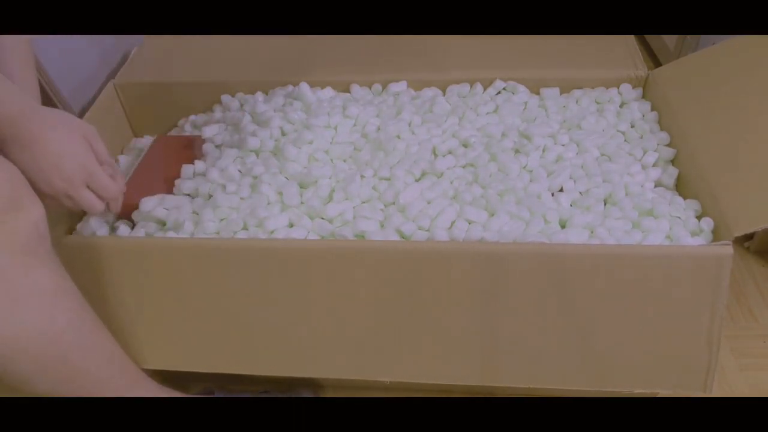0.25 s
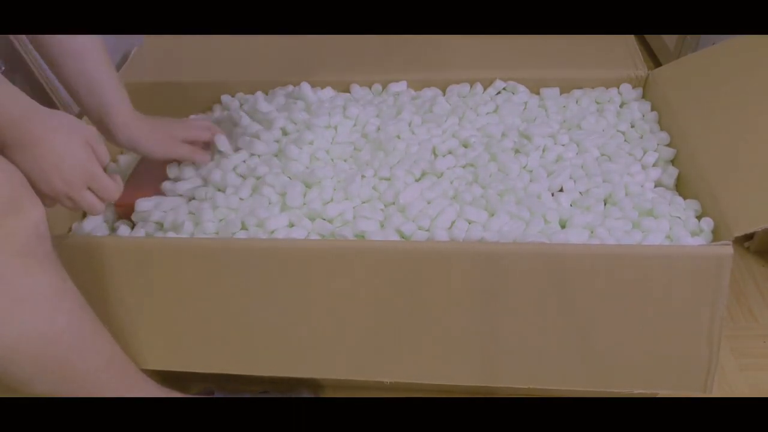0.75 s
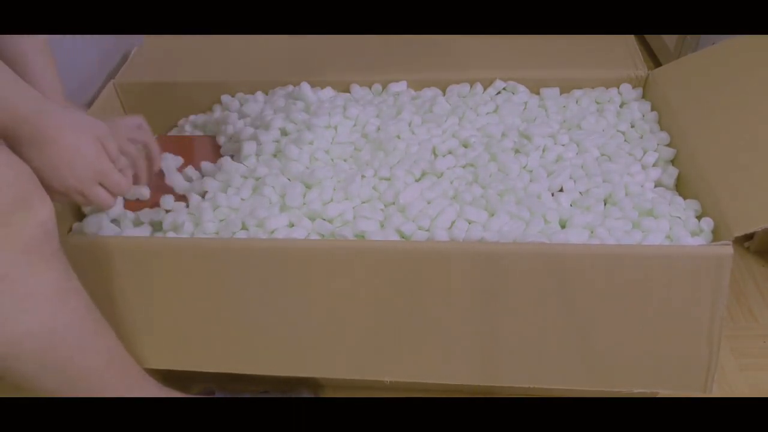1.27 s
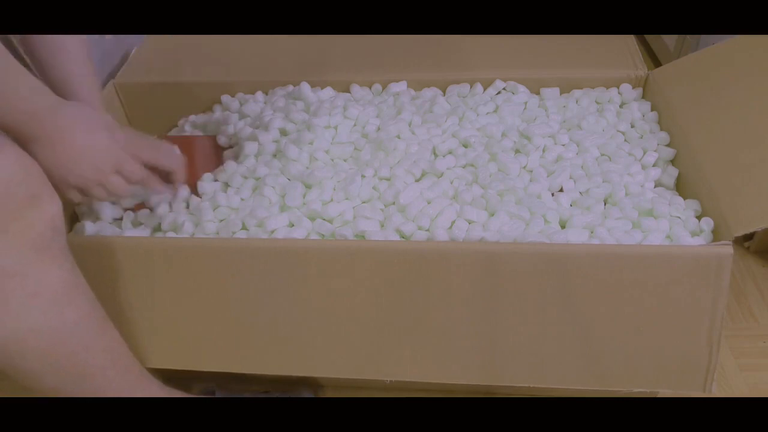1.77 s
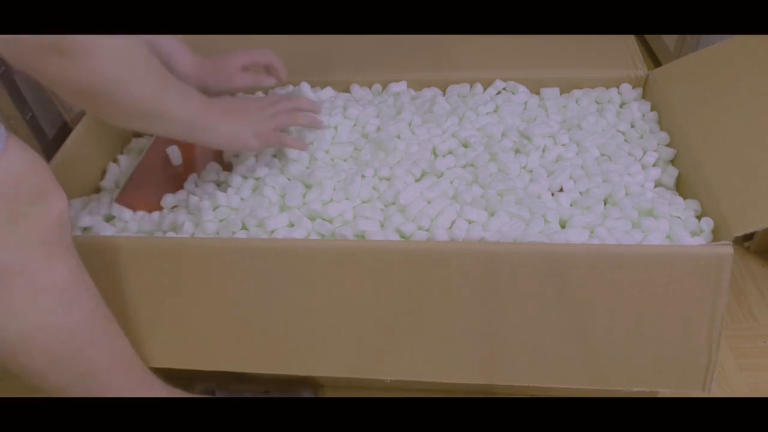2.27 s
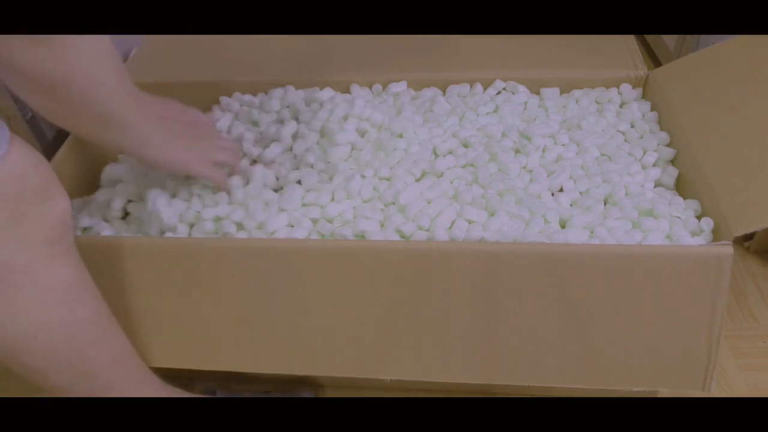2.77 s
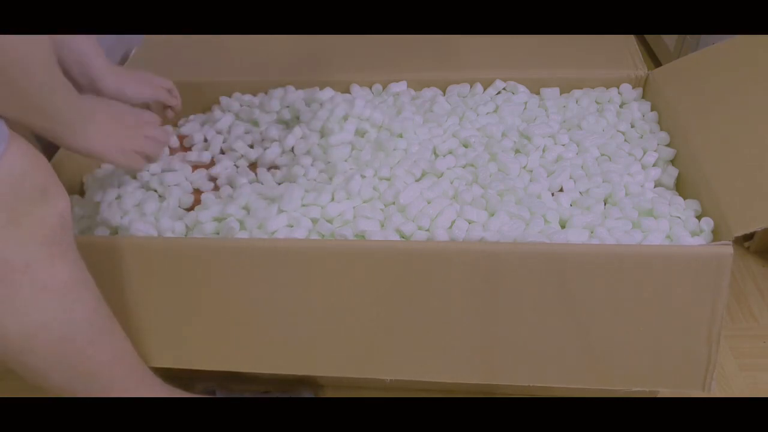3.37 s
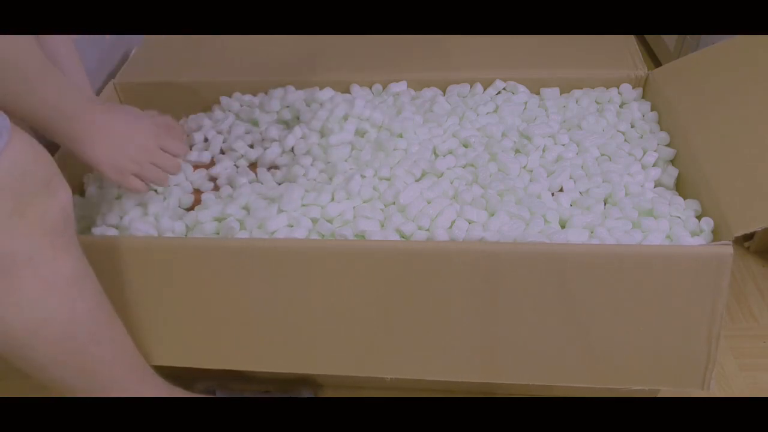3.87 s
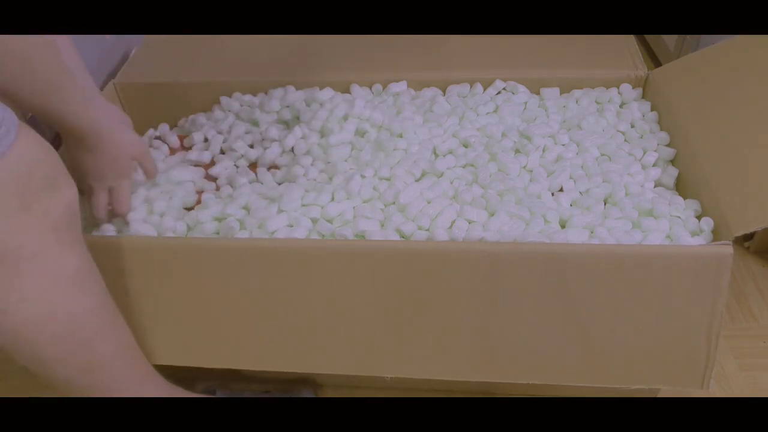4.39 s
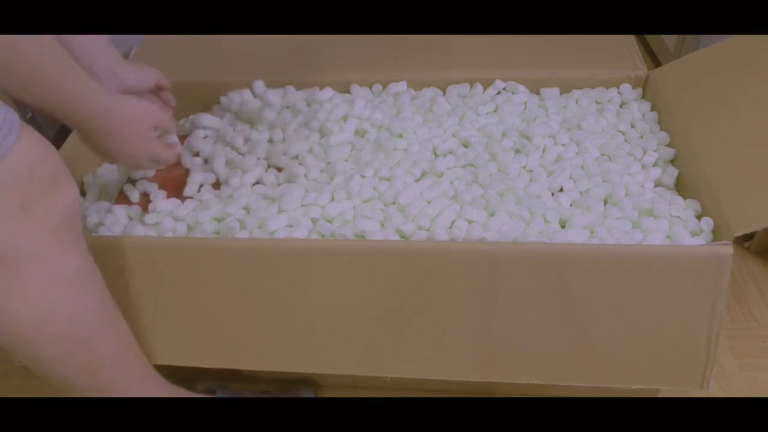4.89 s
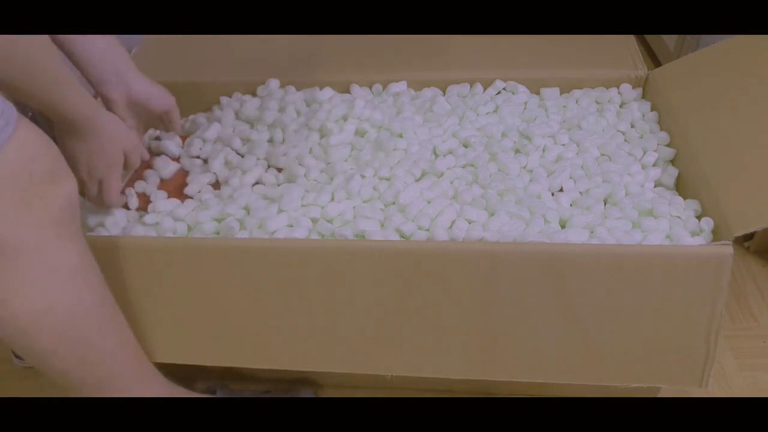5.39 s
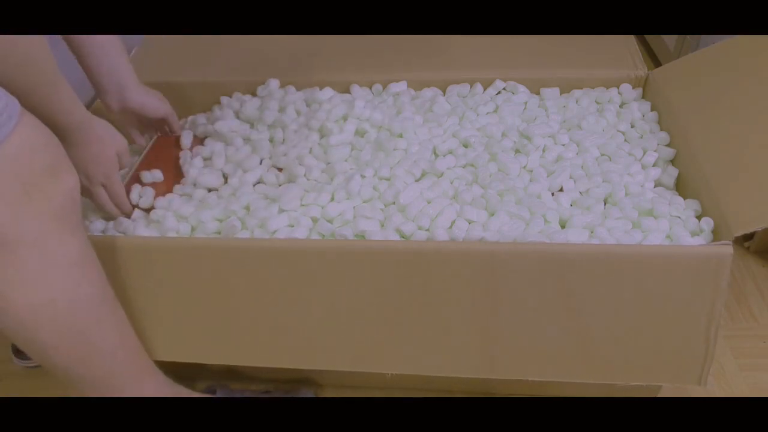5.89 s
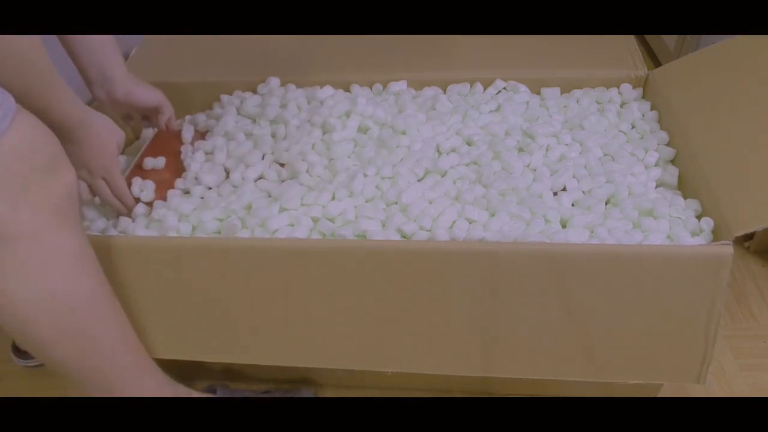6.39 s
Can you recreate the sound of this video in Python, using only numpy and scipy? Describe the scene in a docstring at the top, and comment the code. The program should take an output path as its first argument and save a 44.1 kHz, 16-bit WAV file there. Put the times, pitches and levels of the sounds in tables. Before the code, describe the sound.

Hands dig through foam packing peanuts in a big cardboard box. The chips crunch and rustle in uneven strokes, with sharp little snaps and one brief high squeal early on, ticking as they settle between pushes. The box walls rumble softly. Near the end, hands knock on the cardboard and a buried parcel scrapes along it. The small room has a faint hum, and the box sits slightly left in stereo.

```python
"""Foam packing peanuts crunch as hands dig through a big cardboard box, in a small room.
The chips stick and slip, tumble with each stroke and settle after it, snap free and briefly squeal.
The box walls rumble under the pushes; at the end a buried parcel is dragged along the cardboard.
Heard on a spaced pair of microphones, the box a little to the left, over room air and a faint hum."""
import sys
import numpy as np
from scipy import signal
from scipy.fft import rfft, irfft
from scipy.io import wavfile
from scipy.ndimage import uniform_filter1d

SR = 44100
rng = np.random.default_rng(int(sys.argv[2]) if len(sys.argv) > 2 else 0)


def log_audio(samples):
    """Write samples as a 16-bit WAV file to the path given in sys.argv[1]."""
    # one column per channel
    frames = np.atleast_2d(samples).T
    # limit to full scale, then quantise
    limited = np.clip(frames, -1, 1)
    pcm = np.round(limited * 32767).astype(np.int16)
    wavfile.write(sys.argv[1], SR, pcm)


N = 292824
TIME = np.arange(N) / SR
ROOM_T60_S, BOX_T60_S, ROOM_TAIL_DB = 0.33, 0.05, -8.5
MIC_SPACING_M, RIGHT_MIC_LAG_S = 0.11, .00017
# the heap rests SETTLED_S after a stroke; a stroke of FULL_STROKE_S or more unsettles it fully
SETTLED_S, FULL_STROKE_S = 0.73, 0.05
DRAG_START_S, DRAG_RISE_S = 6.10, 0.18

# the hum in the room wavers and fades: (t/s, f/Hz, level/dB)
HUM_CURVE = [(0, 190.8, -82), (.9, 193.3, -68.5), (1.15, 195, -94), (2.3, 194.2, -78.5), (3.25, 185, -90),
             (3.8, 190.2, -83.5), (4.4, 189, -101)]
# spectra of room air, box walls, parcel scrape, hollow box and foam chips: (f/Hz, relative level/dB)
AIR_SPECTRUM = [(20, 1), (55, 3), (100, -21.5), (300, -0.5), (1000, -16.5), (2000, -41), (5000, -1.5),
                (9000, -13.5), (16000, -38.5)]
WALL_SPECTRUM = [(20, -45.5), (40, -14), (58, 1.5), (85, 2.5), (125, -7), (200, -17), (500, -45)]
SCRAPE_SPECTRUM = [(150, -3), (400, -5), (1200, -9.5), (2200, 1.5), (3100, 2.5), (4200, -3.5),
                   (7000, -14.5), (14000, -20)]
HOLLOW_SPECTRUM = [(70, -48.5), (140, -5.5), (240, 0.5), (420, -4), (700, -2), (1200, -2), (1600, -2),
                   (2200, -8), (3200, -11), (6000, -47), (12000, -38)]
FOAM_SPECTRUM = [(500, -29), (1800, -8.5), (2400, -2), (2900, -2), (3800, -2), (5000, -3), (6700, -4),
                 (7700, -10), (10000, -7), (14000, -9), (16000, -14)]
# cardboard panel resonances: (f/Hz, width/Hz, gain/dB)
PANEL_MODES = [(320, 25, -12.5), (413, 43, 3), (572, 79, -3), (870, 35, 1.5), (1030, 70, -5.5)]
# fingers and wrists knock on cardboard: (t/s, relative peak/dB, ring f/Hz)
HAND_KNOCKS = [(.08, -51, 112), (.492, -69, 990), (1.031, -51, 880), (1.124, -45, 900), (5.875, -37, 440),
               (5.986, -29.5, 1470)]
# a fingertip rubs on the parcel: (t/s, length/s, f/Hz, relative level/dB)
FINGER_RUBS = [(3.961, .024, 744, -57), (3.997, 0.017, 768, -68.5)]
# harmonics of that rub, from the fundamental up: (relative level/dB)
RUB_HARMONICS = [0, -4, -4]
# foam squeals on foam: (t/s, length/s, f/Hz, relative level/dB, octave overtone/dB)
FOAM_SQUEALS = [(1.589, .014, 6830, -40.5, -0.5), (1.601, 0.011, 6810, -23.5, -14),
                (1.606, .006, 7960, -36, -22), (1.615, 0.015, 6766, -29, -5), (1.63, 0.018, 7060, -23, -20),
                (1.637, 0.0098, 8200, -33, -21), (1.657, 0.016, 7120, -32, -6)]
# a chip slips free: (t/s, relative peak/dB, ring f/Hz)
CHIP_SNAPS = [(0.4958, -51.5, 6340), (0.9217, -15.5, 3730), (1.0128, -25.5, 5860), (1.545, -38, 4930),
              (1.9545, -43.5, 4380), (2.16, -46, 4670), (2.592, -21, 6160), (2.9435, -24.5, 5000),
              (3.3623, -46.5, 4070), (3.5706, -36, 5510), (4.265, -37, 5400), (4.2857, -33, 3860),
              (4.342, -31, 4770), (4.4188, -28.5, 3360), (5.0826, -34, 8200), (5.343, -35, 5200),
              (5.4355, -28.5, 4540), (5.4863, -23.5, 4300), (5.7313, -32, 4540), (5.9244, -28.5, 5460),
              (5.9399, -26.5, 5500), (6.0592, -27.5, 4500), (6.1436, -26, 3900), (6.1688, -26, 3840)]
# a hand pushes into the heap, levels relative: (t/s, rise/s, length/s, chips/dB, bumps/dB, walls/dB)
HAND_STROKES = [(-.02, 0.016, 0.14, -67.5, -66, -62.5), (.575, 0.041, .078, -46, -65, -80),
                (0.611, 0.091, 0.12, -42, -50.5, -79), (0.731, 0.018, 0.099, -51, -65, -72),
                (0.862, 0.063, .09, -42, -50.5, -71), (0.968, 0.037, 0.12, -47, -56.5, -77),
                (1.178, 0.03, 0.15, -74, -65, -87), (1.514, 0.036, 0.11, -47, -56.5, -66),
                (1.623, .036, 0.076, -49, -58.5, -57.5), (1.753, .035, .044, -50, -54, -81),
                (1.877, 0.021, 0.13, -64.5, -67, -86), (2.148, .013, 0.028, -72, -93, -90),
                (2.366, .052, .34, -37.5, -45, -60.5), (2.743, 0.069, 0.21, -43, -50.5, -63.5),
                (3.04, 0.025, 0.086, -66.5, -66.5, -77), (3.549, 0.039, 0.038, -55.5, -70, -81),
                (3.657, .038, 0.045, -61, -73, -82), (3.847, 0.018, 0.11, -63.5, -75.5, -82),
                (3.937, .027, 0.042, -56, -74.5, -82), (4.07, .05, 0.068, -71, -81, -86),
                (4.27, 0.049, 0.089, -43.5, -50.5, -62.5), (4.407, 0.011, 0.022, -42, -47.5, -55),
                (4.477, 0.022, 0.1, -48.5, -62, -78), (4.582, 0.08, 0.084, -41.5, -49, -82),
                (4.764, 0.017, 0.18, -61, -64.5, -76), (5.052, 0.04, 0.071, -58.5, -67.5, -59),
                (5.103, 0.024, 0.033, -54, -48, -67), (5.246, 0.0092, 0.011, -58, -71, -80),
                (5.385, 0.086, 0.16, -42.5, -49.5, -59), (5.584, 0.022, 0.083, -52, -61, -70),
                (5.727, 0.0068, 0.014, -46.5, -55, -62), (5.81, 0.051, 0.071, -42, -47, -50),
                (5.929, 0.077, 0.13, -47, -49, -53.5), (6.082, 0.048, 0.078, -49.5, -53, -70)]
CHIPS_COLUMN, BUMPS_COLUMN, WALLS_COLUMN = 3, 4, 5
# top treble of the crunch: (t/s, gain/dB)
CRUNCH_TREBLE = [(.65, -4.5), (1.07, -0.5), (1.25, -8.5), (1.58, 0), (2.4, -2), (3.1, -4), (3.6, -3),
                 (4.75, -4), (5.15, 1), (5.75, -4), (6.15, -1.5)]


def from_db(db):
    """Decibels to gain."""
    return 10 ** (np.asarray(db) / 20)


def rms_one(x):
    """Scale to an rms of one."""
    return x / np.sqrt(np.mean(x ** 2) + 1e-20)


def in_time(rows):
    """The columns of a curve at every sample."""
    times, *columns = np.transpose(rows)
    return [np.interp(TIME, times, column) for column in columns]


def drift(per_s):
    """A random wander with an rms of one."""
    knots = rng.standard_normal(8192)
    return rms_one(np.interp(TIME * per_s, np.arange(len(knots)), knots))


def colour(x, spectrum, size=16384):
    """Causal (minimum-phase) filter that follows a spectrum."""
    hz, db = np.transpose(spectrum)
    bin_hz = np.arange(size // 2 + 1) * SR / size
    gain = from_db(np.interp(np.log(bin_hz + 1), np.log(hz), db))
    cepstrum = irfft(np.log(gain))
    cepstrum[1:size // 2] *= 2
    cepstrum[size // 2 + 1:] = 0
    response = irfft(np.exp(rfft(cepstrum)))
    return np.apply_along_axis(signal.oaconvolve, -1, x, response)[..., :N]


def brighten(x, above_hz, db):
    """Raise or lower everything above a frequency."""
    low = signal.sosfiltfilt(signal.butter(3, above_hz, fs=SR, output="sos"), x)
    return low + from_db(db) * (x - low)


def resonate(x, hz, width_hz):
    """One resonance with a gain of one at its peak."""
    radius = np.exp(-np.pi * width_hz / SR)
    feedback = [1, -2 * radius * np.cos(2 * np.pi * hz / SR), radius ** 2]
    return signal.lfilter(np.array([1, 0, -1]) * (1 - radius ** 2) / 2, feedback, x + 1e-18)


def slips(per_s, spread_db):
    """Random tiny clicks of uneven size; their mean power does not depend on their rate."""
    chance = np.clip(per_s / SR, 1e-4, 1) * np.ones(N)
    at = np.flatnonzero(rng.random(N) < chance)
    clicks = np.zeros(N)
    sizes = from_db(spread_db * np.minimum(rng.exponential(1, N)[at], 4))
    clicks[at] = sizes * np.sign(rng.random(N)[at] - .5) / np.sqrt(chance[at])
    return rms_one(clicks)


def bursts(rows, t60_s, width_share, crack_db, gain_db):
    """Each contact lets go in a dying run of slips that rings the piece it happens on."""
    out, age = np.zeros(N + SR), TIME[:SR // 4]
    for start_s, peak_db, hz in rows:
        run = rng.standard_normal(len(age)) * from_db(-60 * age / t60_s)
        burst = rms_one(resonate(run, hz, hz * width_share)) + from_db(crack_db) * rms_one(run)
        at = int(start_s * SR)
        out[at:at + len(age)] += from_db(peak_db + gain_db) * burst / np.abs(burst).max()
    return out[:N]


def squeak(start_s, length_s, hz, level_db, partials, jitter, flutter_db, rise_s=0.0024, fall_db_per_s=2200):
    """Stick-slip locks into a pitch for a moment, unsteady in speed and grip, then lets go."""
    age = TIME[:SR // 8]
    speed = np.interp(age * 1500, np.arange(512), rng.standard_normal(512))
    pressure = np.interp(age * 300, np.arange(512), rng.standard_normal(512))
    phase = 2 * np.pi * np.cumsum(hz * (1 + jitter * speed)) / SR
    tone = sum(from_db(db) * np.sin(k * phase) for k, db in enumerate(partials, 1))
    release_db = fall_db_per_s * np.maximum(age - length_s, 0)
    grip = np.minimum(age / rise_s, 1) * from_db(level_db + flutter_db * pressure - release_db)
    out, at = np.zeros(N), int(start_s * SR)
    out[at:at + len(age)] = np.sqrt(2) * grip * tone
    return out


def dragging():
    """Gain of the pull on the parcel: it gets going and stays."""
    return np.clip((TIME - DRAG_START_S) / DRAG_RISE_S, 0, 1)


def stirring(column, lag_s, fall_db_per_s, settle_db, settle_db_per_s, drag_db, rest_db):
    """Level in dB stirred by hands and parcel: a stroke builds, holds and stops; the heap settles on."""
    t = TIME[::32]
    power = from_db(rest_db) ** 2 + (from_db(drag_db) * dragging()[::32]) ** 2
    for stroke in HAND_STROKES:
        start_s, rise_s, length_s = stroke[:3]
        age = t - start_s - lag_s
        after = np.maximum(age - length_s, 0)
        rise = np.clip(age / rise_s, 0, 1)
        push = from_db(-fall_db_per_s * after)
        unsettled = np.clip(1 - after / SETTLED_S, 0, 1) * min(length_s / FULL_STROKE_S, 1)
        settling = from_db(settle_db - settle_db_per_s * after) * unsettled
        power += (from_db(stroke[column]) * rise * np.maximum(push, settling)) ** 2
    return np.interp(TIME, t, 10 * np.log10(power))


def chip_level():
    """How hard the chips are stirred, in dB."""
    return stirring(CHIPS_COLUMN, lag_s=0, fall_db_per_s=209.5, settle_db=-11.5, settle_db_per_s=25.5,
                    drag_db=-56, rest_db=-83)


def room(x, wet_db, spots=1, hop_samples=128):
    """Direct sound from the left, quick scatter in the box and a room tail, at two spaced microphones."""
    t = TIME[:SR // 3]
    fade = (from_db(-60 * t / BOX_T60_S) + from_db(ROOM_TAIL_DB - 60 * t / ROOM_T60_S)) * (t > .001)
    hz = np.arange(len(t) // 2 + 1) * SR / len(t)
    # diffuse sound is alike at both microphones only where its waves are long
    alike = np.clip(np.sinc(2 * hz * MIC_SPACING_M / 343), -1, .95)
    # the sound hops among spots in the box, each with echoes of its own
    spot = rng.integers(0, spots, N)[np.arange(N) // hop_samples]
    mics = np.array([x, np.interp(TIME - RIGHT_MIC_LAG_S, TIME, x)])
    for k in range(spots):
        mid, side = rfft(rng.standard_normal((2, len(t))))
        tail = fade * irfft(np.sqrt(1 + alike) * mid + np.sqrt(1 - alike) * side * [[1], [-1]], len(t))
        tail /= np.sqrt(np.sum(tail ** 2) / 2)
        here = np.sin(np.pi / 2 * uniform_filter1d(1. * (spot == k), size=hop_samples))
        mics += from_db(wet_db) * signal.oaconvolve((x * here)[None], tail, axes=1)[:, :N]
    return mics / np.sqrt(1 + from_db(2 * wet_db))


def room_tone(air_db=-76.5):
    """A thin hum and quiet air, its lows alike at both microphones."""
    hz, level_db = in_time(HUM_CURVE)
    hum = np.sqrt(2) * from_db(level_db) * np.sin(2 * np.pi * np.cumsum(hz) / SR)
    mid, side = rng.standard_normal((2, N))
    side = signal.sosfilt(signal.butter(1, 700, "high", fs=SR, output="sos"), side)
    return hum + from_db(air_db) * rms_one(colour(mid + side * [[1], [-1]], AIR_SPECTRUM))


def wall_rumble(gain_db=-1.0, side_db=-15):
    """The big walls of the box flex and rumble when pushed."""
    level_db = stirring(WALLS_COLUMN, lag_s=-.004, fall_db_per_s=157, settle_db=-13, settle_db_per_s=32,
                        drag_db=-60, rest_db=-90)
    walls = slips(600, spread_db=2.3) + from_db(side_db) * slips(600, spread_db=2) * [[1], [-1]]
    return from_db(level_db + gain_db) * rms_one(colour(walls, WALL_SPECTRUM))


def parcel_scrape(level_db=-44.5):
    """The parcel drags over cardboard: very dense, even slips."""
    return from_db(level_db) * dragging() * rms_one(colour(slips(12000, spread_db=3.2), SCRAPE_SPECTRUM))


def finger_rubs():
    """A fingertip sticks and slips on the parcel in a rough, low squeak."""
    return sum(squeak(*row, RUB_HARMONICS, jitter=0.088, flutter_db=3) for row in FINGER_RUBS)


def hand_knocks():
    """Fingers and wrists strike the cardboard, which rings briefly."""
    return bursts(HAND_KNOCKS, t60_s=0.035, width_share=0.19, crack_db=-37.0, gain_db=1.5)


def tumble(per_s=2200, spread_db=4.0, clump_db=0.64, gain_db=2.5, hardening=0.55):
    """Bumps of light chips and skin, coloured by the cardboard panels; gentle ones are duller."""
    level_db = stirring(BUMPS_COLUMN, lag_s=0.00288, fall_db_per_s=233, settle_db=-5.5,
                        settle_db_per_s=49.5, drag_db=-51, rest_db=-88)
    bumps = slips(per_s * from_db(0.33 * (level_db + 49.5)), spread_db) * from_db(clump_db * drift(70))
    panels = sum(from_db(db) * resonate(bumps, hz, width) for hz, width, db in PANEL_MODES)
    hollow = rms_one(colour(bumps + panels, HOLLOW_SPECTRUM))
    treble_db = hardening * np.maximum(level_db + 54.5, -25)
    return from_db(level_db + gain_db) * brighten(hollow, 1410, treble_db)


def chip_ticks(per_s=45, spread_db=9.5, gain_db=-13, above_hz=4000):
    """Lone chips on top of the heap settle with bright ticks, which stand out once the stirring eases."""
    bright = signal.sosfilt(signal.butter(1, above_hz, "high", fs=SR, output="sos"), slips(per_s, spread_db))
    return from_db(np.minimum(chip_level(), -48) + gain_db) * bright


def chip_squeals(judder_hz=165, judder_depth=0.23):
    """Chips squeal against each other in a quick run of slips, juddering as they slide."""
    judder = 1 + judder_depth * np.sin(2 * np.pi * judder_hz * TIME)
    return judder * sum(squeak(*row, [0, octave_db], jitter=.015, flutter_db=1.3)
                        for *row, octave_db in FOAM_SQUEALS)


def chip_snaps():
    """Single chips slip free with a sharp crack."""
    cracks = bursts(CHIP_SNAPS, t60_s=0.014, width_share=0.32, crack_db=1.5, gain_db=8.5)
    return colour(cracks, FOAM_SPECTRUM)


def chip_crunch(per_s=6000, spread_db=3.5, clump_db=1.5, ring_db=-9, gain_db=4.0, thickening=0.075):
    """Stick-slip between chips: harder stirring sets more contacts going; single chips ring in passing."""
    level_db = chip_level()
    effort_db = level_db + 45
    grains = slips(per_s * from_db(.6 * effort_db), spread_db) * from_db(clump_db * drift(130))
    rings = sum(resonate(slips(140, spread_db=1), hz, width_hz=720) for hz in np.linspace(2900, 6600, 9))
    foam = rms_one(colour(rms_one(grains) + from_db(ring_db) * rms_one(rings), FOAM_SPECTRUM))
    # light touches bring out less of the chips' lower range
    body_db = thickening * np.maximum(effort_db, -25)
    foam = from_db(body_db) * brighten(foam, 2700, -body_db)
    return from_db(level_db + gain_db) * brighten(foam, 9100, in_time(CRUNCH_TREBLE)[0])


def scene():
    """Everything in the box, heard through the room at the left and right microphones."""
    snaps, knocks, rubs = chip_snaps(), hand_knocks(), finger_rubs()
    foam = room(chip_crunch(), wet_db=5, spots=7, hop_samples=96)
    # sounds from the top of the heap arrive more directly than those from within
    foam += room(snaps + chip_ticks() + rubs, wet_db=3.5)
    foam = brighten(foam, 6480, [[1.2], [-1.2]])   # the treble is shaded at the far microphone
    cardboard = room(tumble() + parcel_scrape() + knocks, wet_db=3, spots=7, hop_samples=192)
    squeals = room(chip_squeals(), wet_db=0.5) * from_db([[-2.5], [.5]])
    rumble = wall_rumble() * from_db([[-.8], [.8]])
    return foam + cardboard + squeals + rumble + room_tone()


def record(dry):
    """Both channels are cut steeply above 15.9 kHz."""
    return signal.sosfilt(signal.ellip(10, .2, 75, 15900, fs=SR, output="sos"), dry)


dry = scene()
out = record(dry)
log_audio(out)
```